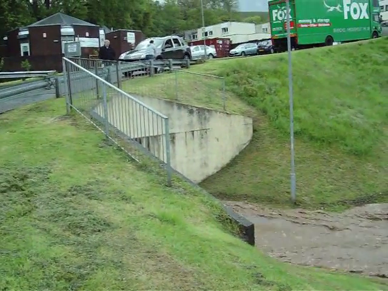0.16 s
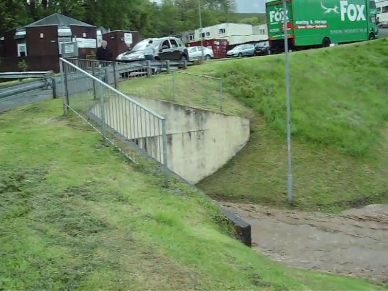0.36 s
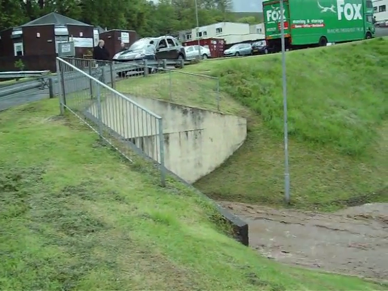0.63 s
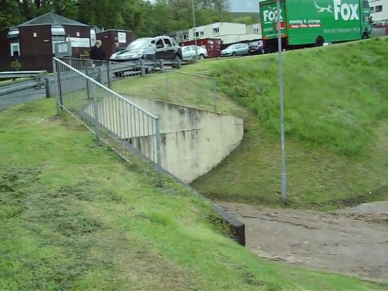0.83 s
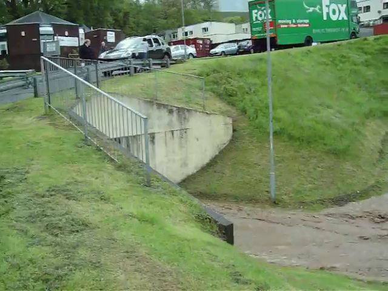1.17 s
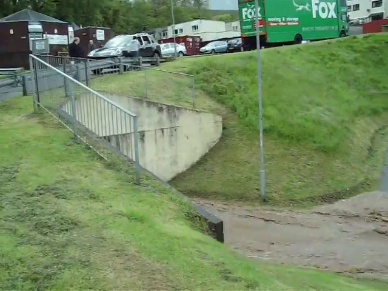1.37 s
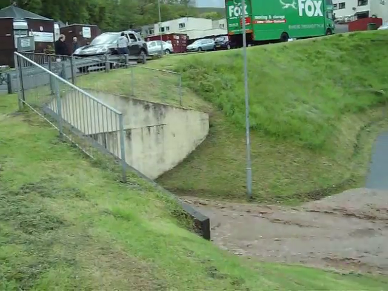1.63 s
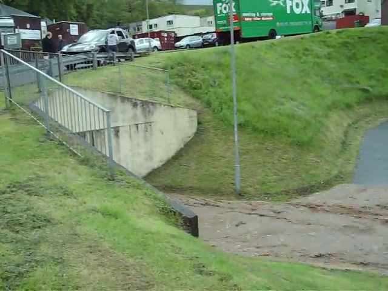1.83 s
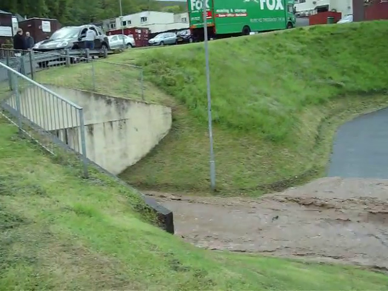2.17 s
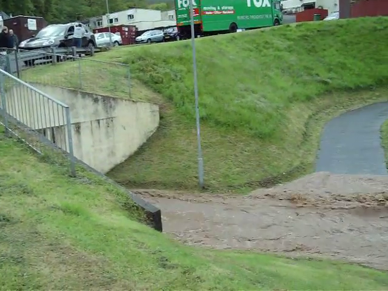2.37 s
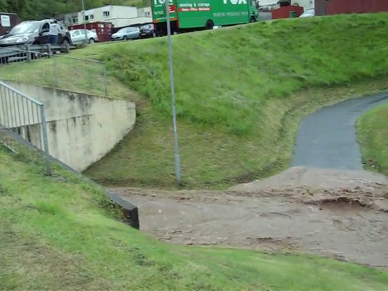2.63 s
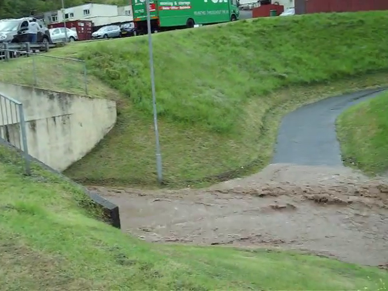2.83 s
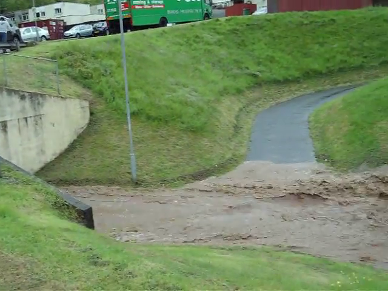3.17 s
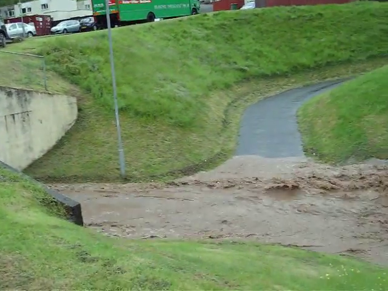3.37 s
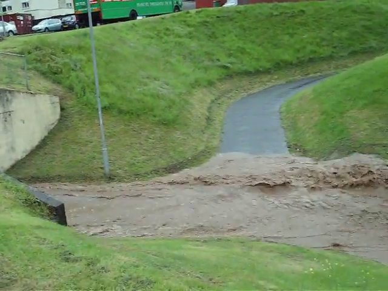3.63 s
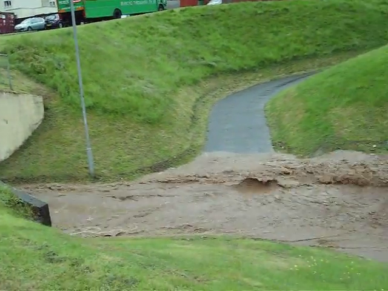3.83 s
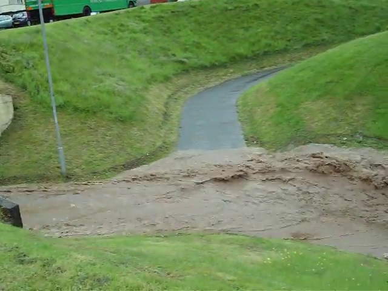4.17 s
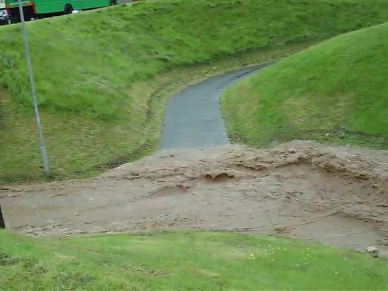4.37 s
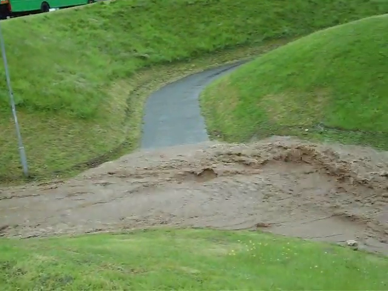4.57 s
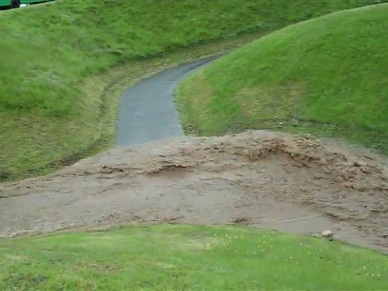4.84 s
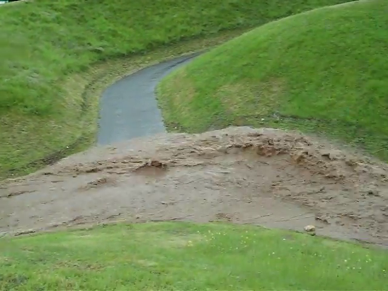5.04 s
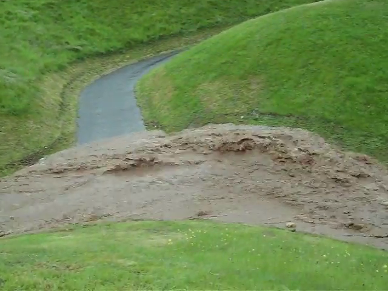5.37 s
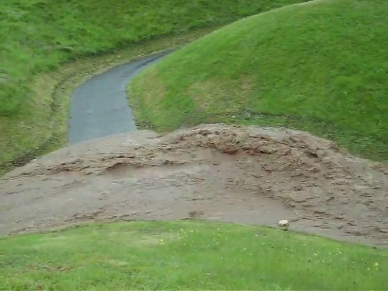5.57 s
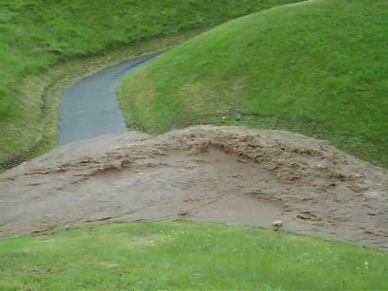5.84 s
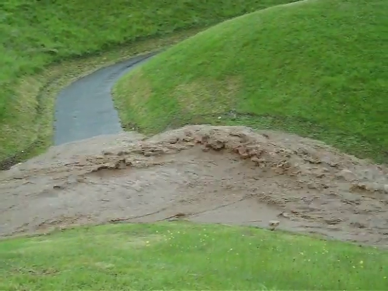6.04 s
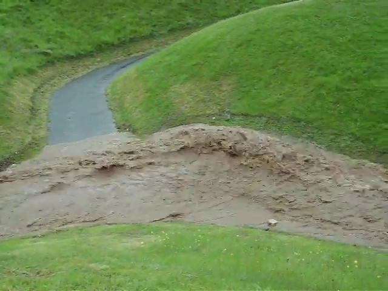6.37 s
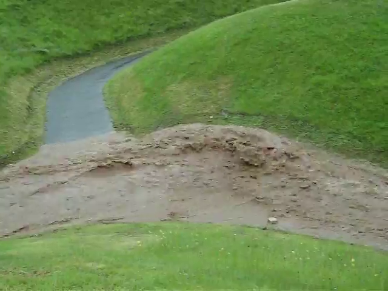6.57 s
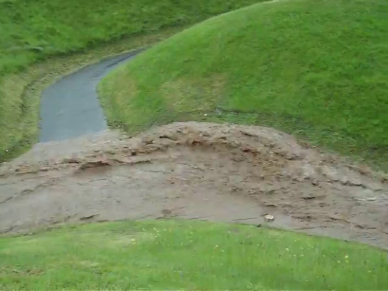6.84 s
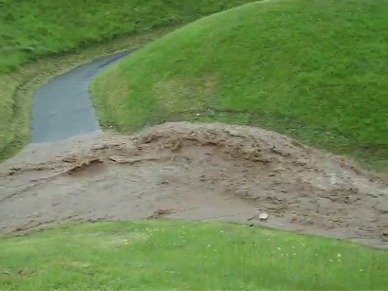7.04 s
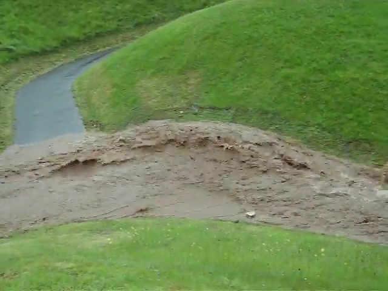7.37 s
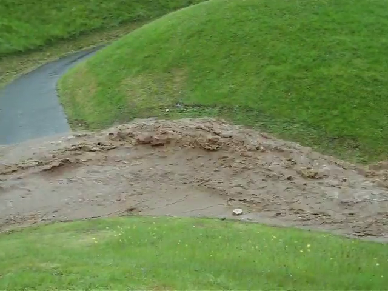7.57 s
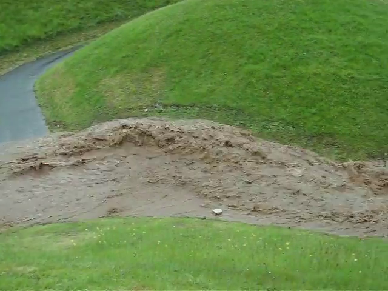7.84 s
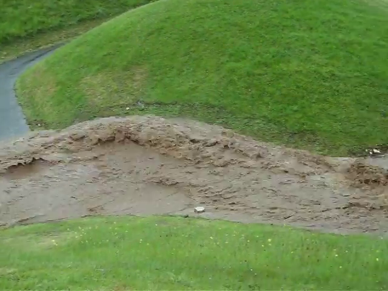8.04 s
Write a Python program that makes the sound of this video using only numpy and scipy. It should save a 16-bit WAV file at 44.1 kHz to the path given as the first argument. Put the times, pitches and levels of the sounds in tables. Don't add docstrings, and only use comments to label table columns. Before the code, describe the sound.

Muddy floodwater roars loudly and steadily in a dense, churning rush, heard close through a small, muffled, overloaded microphone.

```python
import sys
import numpy as np
from scipy import signal
from scipy.fft import rfft, irfft, next_fast_len
from scipy.io import wavfile
from scipy.ndimage import uniform_filter1d

SR = 44100
rng = np.random.default_rng(int(sys.argv[2]) if len(sys.argv) > 2 else 0)


def invert_db(x):
    u = np.asarray(x, float) / 20
    return 10 ** u


def wrap_up_sound(samples):
    columns = np.atleast_2d(samples).T
    tamed = np.clip(columns, -1, 1)
    steps = np.round(tamed * 32767).astype(np.int16)
    wavfile.write(sys.argv[1], SR, steps)


N = 361179
STEP = 40

LAYER_HZ = [260, 750, 1900, 4200]
# (time [s], level [dB])
FLOW = [(0.0, -13.5), (0.09, -11), (2.19, -11), (2.42, -13), (2.51, -12), (3.51, -10.5), (3.56, -13),
        (3.72, -11), (5.81, -12), (5.88, -13.5), (6.09, -10.5), (6.11, -13.5), (6.57, -10.5), (6.66, -10),
        (6.68, -14), (6.77, -12), (7.51, -11.5), (8.19, -12.5)]
FOLLOWS_FLOW = [1.1, 1.05, 0.65, .6]
# (time [s], share of the turn [0-1])
TURN = [
    (0, 0.05),
    (2.2, 0.2),
    (4.6, 0.8),
    (8.19, 1),
]
TURN_GAIN_DB = [0.5, 0.66, -3.0, 2.5]
CHURN_DB = [0.8, 0.66, 0.37, 0.44]
# (pitch [Hz], level [dB per Hz])
WATER_COLOUR = [(40, -49.5), (70, -22), (130, -10), (285, 1.5), (390, -1), (750, 1), (920, -1), (1010, -6),
                (1200, -15), (1360, -11), (1760, -17), (2260, -18), (3100, -19), (6000, -24)]
# (pitch [Hz], width [Hz], lift facing culvert [dB], lift facing wave [dB])
HOUSING = [(386, 100, 2.1, -4), (1420, 180, 0, 0), (2732, 200, 5, 4), (3110, 350, -5.5, -0.5),
           (3880, 420, 2, -1), (4720, 570, -3.5, -0.5)]
# (pitch [Hz], level [dB per Hz])
RUMBLE_COLOUR = [(9, -29), (18, -6.5), (30, -7.5), (41, 3), (52, -6.5), (66, -3.5), (100, -11),
                 (130, -29.5), (220, -100)]
# (pitch [Hz], level [dB])
BAND_EDGE = [(5000, 0), (5250, -1.5), (5500, -4), (5750, -11.5), (6000, -22.5), (6200, -36), (6400, -62),
             (6900, -80.5), (8500, -110)]


def rms_one(x):
    return x / np.sqrt(np.mean(x ** 2) + 1e-20)


def drift(rate_hz):
    r = np.exp(-2 * np.pi * STEP * rate_hz / SR)
    settling = 2000
    noise = rng.standard_normal(N // STEP + settling + 1)
    return rms_one(signal.lfilter([1], [1, -2 * r, r * r], noise)[settling:])


def full_rate(control):
    return np.interp(np.arange(N) / STEP, np.arange(len(control)), control)


def filtered(x, spectrum, modes=()):
    hz = np.maximum(np.fft.rfftfreq(N, 1 / SR), 1)
    points = np.array(spectrum)
    gain_db = np.interp(np.log(hz), np.log(points[:, 0]), points[:, 1])
    for mode_hz, width_hz, lift_db in modes:
        gain_db += lift_db / (1 + (2 * (hz - mode_hz) / width_hz) ** 2)
    size = next_fast_len(N)
    gain = np.interp(np.fft.rfftfreq(size, 1 / SR), hz, invert_db(gain_db))
    return irfft(rfft(x, size) * gain, size)[..., :N]


def bubbles(hz, sizes):
    bursts_per_cycle, ring_cycles = 6.0, 9.0
    steady_s = 0.22
    born = rng.random(N) < bursts_per_cycle * hz / SR
    r = invert_db(-60 * hz / (ring_cycles * SR))
    poles = [1, -2 * r * np.cos(2 * np.pi * hz / SR), r * r]
    rings = signal.lfilter([1, 0, -1], poles, sizes * born)
    power = uniform_filter1d(rings ** 2, int(steady_s * SR))
    return rings * np.sqrt(hz / (power + 1e-12))


def layer_levels():
    s = np.arange(len(drift(5.4))) * STEP / SR
    flow_db = np.interp(s, *np.transpose(FLOW))
    turned = np.interp(s, *np.transpose(TURN))
    flow_swing_db = flow_db - flow_db.mean()
    turn_swing = turned - turned.mean()
    levels_db = []
    for share, turn_db, churn_db in zip(FOLLOWS_FLOW, TURN_GAIN_DB, CHURN_DB):
        levels_db.append(share * flow_swing_db + turn_db * turn_swing + churn_db * drift(5.4))
    return np.array(levels_db)


def flood(splash_db, own_db):
    size_spread_db = 1.2
    sizes = invert_db(size_spread_db * rng.exponential(1, N)) * rng.choice([-1, 1], N)
    slaps = drift(9.4)
    layers_db = layer_levels()
    water = 0
    for hz in np.geomspace(50, 7000, num=36):
        nearness = [np.interp(np.log(hz), np.log(LAYER_HZ), layer) for layer in np.eye(len(LAYER_HZ))]
        slap_db = splash_db * np.clip(hz / 3500, 0, 1) * slaps
        flicker_db = slap_db + own_db * drift(8.6)
        level = invert_db(nearness @ layers_db + flicker_db)
        water = water + bubbles(hz, sizes) * full_rate(level)
    return water


def heard_from_bank(water):
    flood_db = -11
    modes = np.array(HOUSING)
    turned = np.clip(np.interp(np.arange(N) / SR, *np.transpose(TURN)), 0, 1)
    culvert = filtered(water, WATER_COLOUR, modes[:, [0, 1, 2]])
    wave = filtered(water, WATER_COLOUR, modes[:, [0, 1, 3]])
    return invert_db(flood_db) * rms_one((1 - turned) * culvert + turned * wave)


def rumble(lumpy_db):
    rumble_db = -43
    gusts = full_rate(invert_db(lumpy_db * drift(2.5)))
    noise = rng.standard_normal(N) * gusts
    return invert_db(rumble_db) * rms_one(filtered(noise, RUMBLE_COLOUR))


def scene():
    water = heard_from_bank(flood(splash_db=0.76, own_db=0.43))
    return (water + rumble(lumpy_db=-1.0))[None]


def band_limit(x):
    return signal.sosfilt(signal.butter(12, 15830, fs=SR, output="sos"), x)


def record(dry):
    every = 4
    overload, offset, ceiling = 0.7, -0.0028, 0.707
    half_rate_hz = SR / every / 2
    guarded = filtered(dry, [(half_rate_hz, 0), (half_rate_hz + 5, -80)])
    kept = np.zeros_like(dry)
    kept[:, ::every] = every * np.clip(guarded[:, ::every] + offset, -overload, overload)
    smooth = np.clip(filtered(kept, BAND_EDGE), -ceiling, ceiling)
    return band_limit(smooth)


dry = scene()
out = record(dry)
wrap_up_sound(out)
```